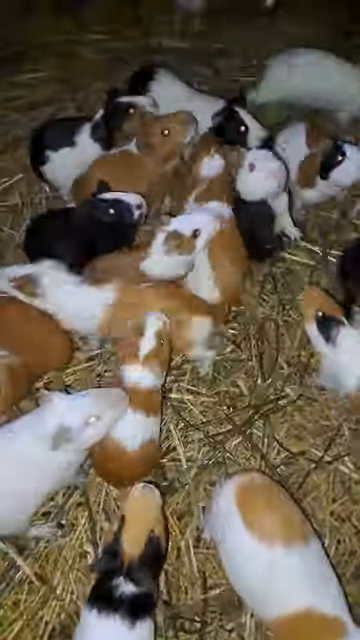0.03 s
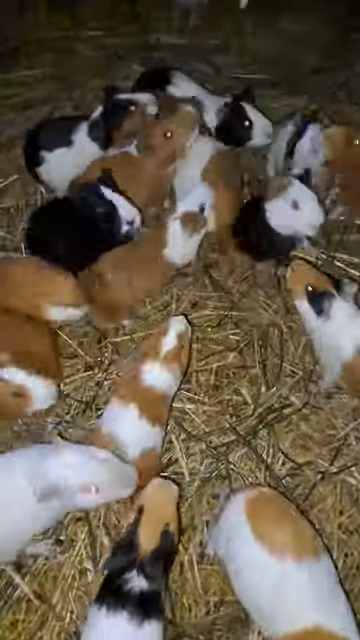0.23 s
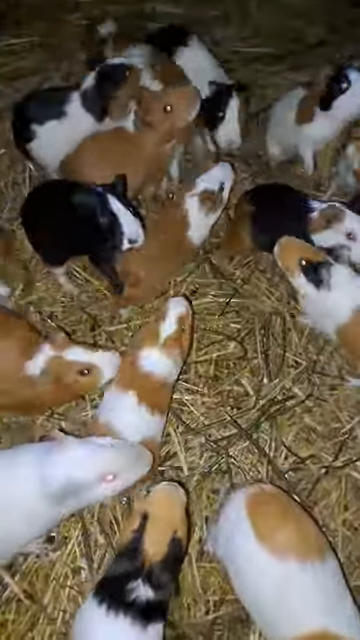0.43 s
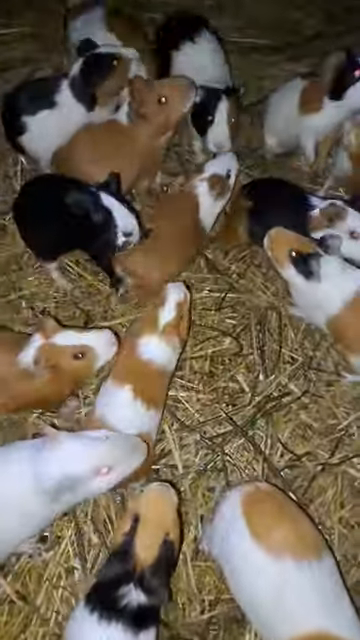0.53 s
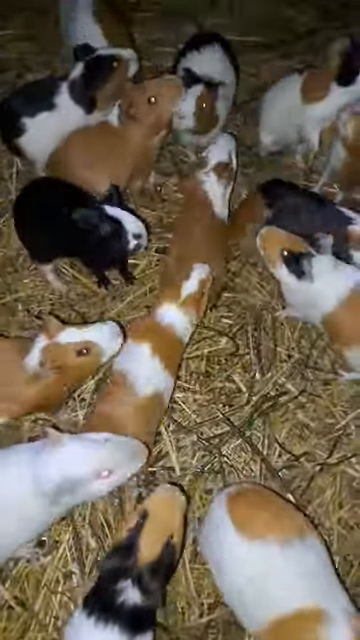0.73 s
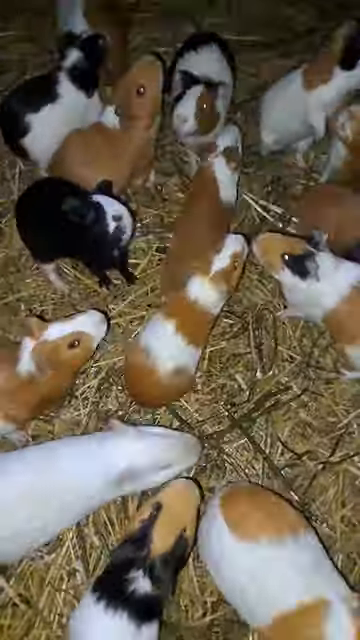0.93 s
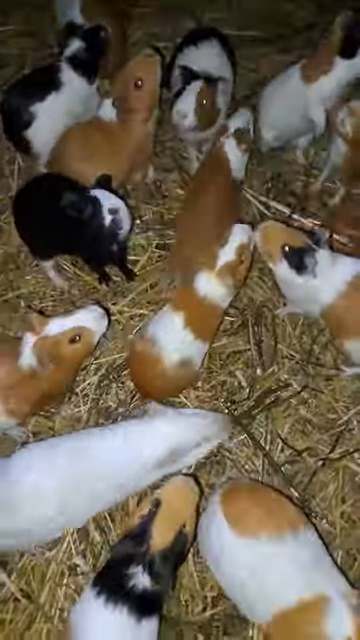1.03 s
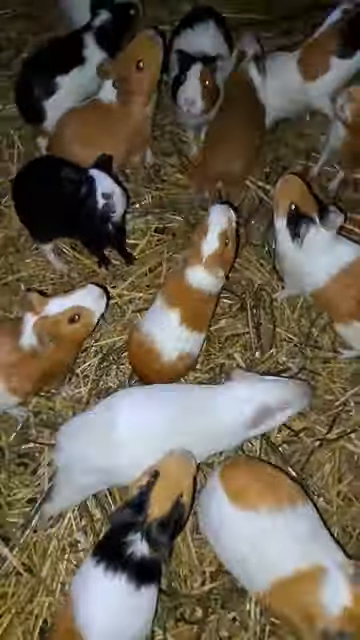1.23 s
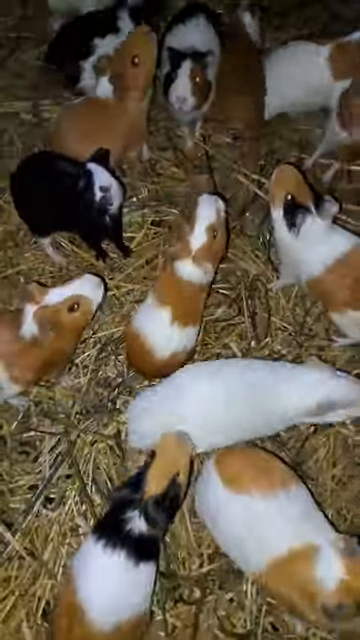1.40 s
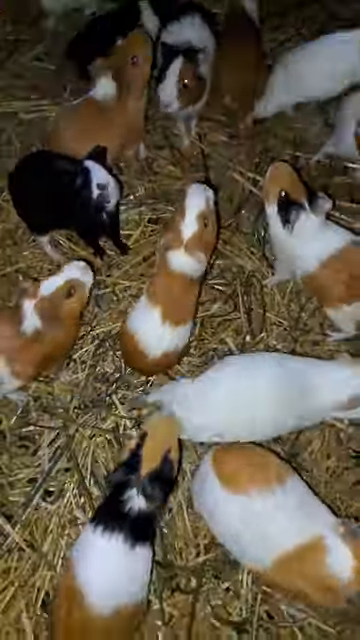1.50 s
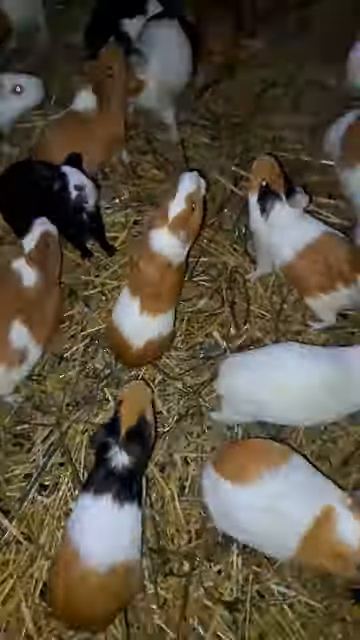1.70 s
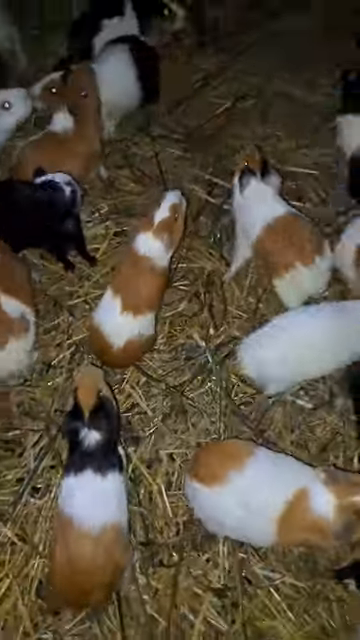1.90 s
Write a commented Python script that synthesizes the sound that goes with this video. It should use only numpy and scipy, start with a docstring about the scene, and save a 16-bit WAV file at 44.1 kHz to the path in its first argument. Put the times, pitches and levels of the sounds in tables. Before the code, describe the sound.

Guinea pigs squeal in rising whistles over a peeping herd and rustling straw.

```python
"""A herd of guinea pigs begs for food on straw in a barn.
From the start the herd chatters in short rising peeps while feet rustle the straw over a low hush.
One close animal wheeks twice: each time a thin rising lead-in, a loud whistle, then a leap upward.
At 1.2 s it gives a third, weaker wheek; the barn rings briefly after each call.
Peeps and rustling carry on to the end, and a stalk cracks among them."""
import sys
import numpy as np
from scipy import signal
from scipy.fft import rfft, irfft, next_fast_len
from scipy.io import wavfile
from scipy.ndimage import uniform_filter1d

SR = 44100
rng = np.random.default_rng(int(sys.argv[2]) if len(sys.argv) > 2 else 0)


def to_wav(s):
    """Save 16-bit WAV."""
    ch = np.atleast_2d(s).T  # columns
    pcm = np.round(np.clip(ch, -1, 1) * 32767)  # PCM
    wavfile.write(sys.argv[1], SR, pcm.astype(np.int16))


N = 85995

# Contours of the three wheeks: time_s, pitch_hz, fundamental_db, octave_db
FIRST_WHEEK = [(0.141, 1250, -44, -49.5), (0.179, 1660, -43.5, -43), (0.229, 2002, -27, -41.5),
               (.25, 2197, -14, -52), (.285, 2325, -13, -28), (0.304, 2402, -13, -24),
               (.313, 2626, -20.5, -22), (0.318, 2940, -24.5, -16), (0.337, 3290, -32, -15),
               (.37, 3763, -29, -31.5), (.416, 4183, -24.5, -31), (0.426, 4500, -24.5, -28),
               (.442, 4434, -24.5, -30.5), (.453, 4030, -30.5, -54)]
SECOND_WHEEK = [(0.63, 771, -41.5, -63), (0.667, 1098, -38, -42), (0.702, 1564, -42, -49.5),
                (0.761, 1657, -56, -34.5), (0.819, 1948, -39, -36), (0.824, 2100, -22.5, -32.5),
                (.85, 2216, -16, -35.5), (.887, 2353, -14.5, -43), (.894, 2493, -15.5, -23),
                (0.896, 2865, -30.5, -18.5), (0.914, 3295, -25, -18), (0.922, 3576, -32, -27.5),
                (0.956, 3970, -35, -35.5), (0.982, 4106, -32.5, -48), (0.996, 3990, -39, -42.5)]
THIRD_WHEEK = [(1.214, 839, -52, -46), (1.259, 1281, -38.5, -49), (1.302, 1377, -49.5, -48.5),
               (1.35, 2000, -50, -46.5), (1.358, 2054, -29, -60), (1.369, 2750, -37, -43),
               (1.393, 3400, -34, -30.5), (1.407, 3728, -33.5, -42.5), (1.421, 3600, -39.5, -42)]
# Throat resonances that colour the overtones: frequency_hz, gain_db
THROAT_RESPONSE = [(1500, 22), (3300, 0.5), (4400, -6), (5500, -0.5), (7300, 1.5), (8400, -16), (9500, -22),
                   (11000, -14.5), (12500, -5.5), (15500, -13)]
# Interchannel level difference of the close animal: frequency_hz, left_minus_right_db
CALLER_BALANCE = [(1200, -14), (2300, -4.5), (3600, -7), (5000, -19.5), (6200, -20), (7200, 3),
                  (8200, 13.5), (9000, 15), (12000, -1.5), (15000, 10)]
JITTER, JITTER_HZ, SHIMMER_DB, SHIMMER_HZ = 0.0016, 350, 1.5, 64.6
RASP_DB, RASP_HZ, HISS_DB, HISS_LOW_HZ = -19, 500, -26, 4500
STRAIN_HZ = 4200  # reference pitch: rasp and hiss grow with the square of pitch
EDGE_S, LEFT_LEAD_S, OVERTONE_STEP_DB = 0.0012, 0.0001, -2.5


def wheek(contour, drive_ceiling_db):
    """Source and filter: a near-pure whistle's overtones flare as they sweep through throat resonances."""
    time_s, pitch_hz, fundamental_db, octave_db = np.transpose(contour)
    t = np.arange(time_s[0], time_s[-1], 1 / SR)
    hz = np.interp(t, time_s, pitch_hz) * (1 + JITTER * wander(len(t), JITTER_HZ))
    cycles = np.cumsum(hz) / SR + np.array([[LEFT_LEAD_S], [0]]) * hz
    fundamental_db, octave_db = np.interp(t, time_s, fundamental_db), np.interp(t, time_s, octave_db)
    # The upper overtones follow the octave's level before the throat, up to a ceiling.
    drive_db = np.minimum(octave_db - at_frequency(THROAT_RESPONSE, 2 * hz), drive_ceiling_db)
    air = highpass(rng.standard_normal((2, len(t))), HISS_LOW_HZ, order=3)
    out = unit_rms(air) * (hz / STRAIN_HZ) ** 2 * amp(octave_db + HISS_DB)
    for k in range(1, 9):
        upper_db = drive_db + at_frequency(THROAT_RESPONSE, k * hz) + OVERTONE_STEP_DB * (k - 2)
        level_db = fundamental_db if k == 1 else octave_db if k == 2 else upper_db
        rasp = amp(RASP_DB) * ((k - 1) * hz / STRAIN_HZ) ** 2
        roughness = (1 + rasp * sideband_noise(len(t), RASP_HZ)) / np.sqrt(1 + 2 * rasp ** 2)
        tone = (roughness * np.exp(2j * np.pi * k * cycles)).real * (k * hz < SR / 2)
        pan = amp(at_frequency(CALLER_BALANCE, k * hz) * np.array([[.5], [-.5]]))
        pan /= np.sqrt(np.mean(pan ** 2, axis=0))
        out += pan * amp(level_db + SHIMMER_DB * wander(len(t), SHIMMER_HZ)) * tone
    return time_s[0], np.sqrt(2) * out * fade(t - time_s[0], EDGE_S, EDGE_S)


PEEP_SWELL, PEEP_RELEASE_S, PEEP_JITTER = 0.11, 0.0041, 0.015
PEEP_OVERTONE_DB, DULL_HZ = -10, 2100  # overtone gain ahead of the low-pass, and its corner
HOARSENESS, HOARSE_HZ, LAG_S_PER_DB = .23, 110, .00005


def peep(start_s, length_s, first_hz, last_hz, level_db, glide_exponent, side_db):
    """Noise modulation makes a short gliding call hoarse; distance dulls its overtones."""
    t = np.arange(0, length_s, 1 / SR)
    hz = first_hz + (last_hz - first_hz) * (t / length_s) ** glide_exponent
    hz *= 1 + PEEP_JITTER * wander(len(t), hz=87.0)
    pan_db = side_db * np.array([[-.5], [.5]])
    cycles = np.cumsum(hz) / SR + pan_db * LAG_S_PER_DB * hz  # the louder side leads
    voice = 0
    for k in range(1, 4):
        roughness = 1 + k * HOARSENESS * sideband_noise(len(t), HOARSE_HZ)
        gain = 1 if k == 1 else amp(PEEP_OVERTONE_DB) / (1 + (k * hz / DULL_HZ) ** 4)
        voice += gain * (roughness * np.exp(2j * np.pi * k * cycles)).real
    return start_s, voice * amp(level_db + pan_db) * fade(t, PEEP_SWELL * length_s, PEEP_RELEASE_S)


# Clear peeps: start_s, length_s, first_hz, last_hz, level_db, glide_exponent, right_minus_left_db
CLEAR_PEEPS = [ (0.057, 0.077, 1966, 2730, -46, 1.8, 7), (0.062, 0.079, 637.6, 930, -38.5, 1.53, 4.5),
               (.19, 0.047, 792, 1410, -37.5, 2.03, 2), (0.335, 0.036, 420.5, 646, -40.5, 2.14, -2.5),
               (.405, 0.063, 721.4, 1400, -42, 2.6, -2), (0.441, 0.11, 459.4, 830, -47, 1.4, 1),
               (0.582, 0.053, 1326, 1434, -37.5, 1.86, 9.5), (0.811, 0.19, 690, 1685, -42.5, 1.28, 1),
               (.99, 0.073, 487, 525, -47.5, 3, -2), (1.028, 0.036, 2800, 3010, -41, 0.51, 4.5),
               (1.16, .16, 744, 1501, -40.5, 2.77, 5), (1.393, 0.058, 887, 2110, -46, 2.42, -1),
               (1.469, 0.0603, 837, 726, -42, 0.99, -4), (1.538, 0.12, 774, 1818, -36, 5.5, 6),
               (1.625, 0.065, 465.4, 697, -43.5, 1.14, 2), (1.716, 0.11, 624.6, 892, -48, 2, -3.5),
               (1.865, 0.041, 464.5, 716, -40.5, 2.34, -1.5), (1.876, 0.032, 838, 1720, -45, 1.4, 7.5),
               (1.918, 0.0298, 1145, 2100, -45.5, 1, 0.5)]
# Steady chatter, then three flurries: start_s, end_s, median_first_hz, median_level_db
CHATTER_SPANS = [(0, 1.96, 783, -52), (0, .2, 950, -45.5), (.13, .18, 518.4, -43),
                 (1.11, 1.18, 1047, -43.5)]
CHATTER_PER_S, EXTRA_PEEPS, CHATTER_RISE, CHATTER_S = 36, 4, 1.6, .065


def herd():
    """Superposition of many voices: clear peeps stand over random chatter from farther back."""
    out = np.zeros((2, N))
    for row in CLEAR_PEEPS:
        add(out, *peep(*row))
    for start_s, end_s, median_hz, level_db in CHATTER_SPANS:
        count = int(CHATTER_PER_S * (end_s - start_s)) + EXTRA_PEEPS
        for i, (shift, stretch, octaves, accent, side) in enumerate(rng.uniform(-.5, .5, (count, 5))):
            onset_s = start_s + (end_s - start_s) * (i + shift) / count
            hz = median_hz * 2 ** octaves
            add(out, *peep(onset_s, CHATTER_S * 2 ** stretch, hz, hz * CHATTER_RISE,
                           level_db + 6 * accent, glide_exponent=2, side_db=20 * side))
    return out


# Envelope of the rustle: time_s, level_db
RUSTLE_ENVELOPE = [(0, -44), (.45, -45), (.56, -49.5), (0.628, -41), (.95, -51.5), (1.1, -55.5),
                   (1.199, -51.5), (1.62, -47.5), (1.72, -50.5), (1.95, -48)]
# Spectrum of the snapping straw: frequency_hz, gain_db
STRAW_SPECTRUM = [(100, -26), (330, 1), (1400, 6.5), (3500, -4), (5600, 1), (7500, -13), (10000, -12.5),
                  (15000, -10.5)]
# Single stalks that crack: start_s, level_db
STALK_CRACKS = [(0.0332, -41.5), (1.6528, -43)]
SNAPS_PER_S, SNAP_SPREAD_DB, CRACK_DECAY_S = 6600, 2.5, 0.0058


def straw():
    """Shot noise: tiny snaps under shuffling feet merge into a rustle; two louder cracks stand out."""
    hz = np.fft.rfftfreq(N, 1 / SR)
    snaps = rng.standard_normal((2, N)) * (rng.random((2, N)) < SNAPS_PER_S / SR)
    snaps *= amp(SNAP_SPREAD_DB * np.minimum(rng.exponential(1, (2, N)), 4))
    out = unit_rms(irfft(rfft(snaps) * amp(at_frequency(STRAW_SPECTRUM, hz)), N))
    out *= amp(np.interp(np.arange(N) / SR, *np.transpose(RUSTLE_ENVELOPE)))
    t = np.arange(SR // 50) / SR
    for start_s, level_db in STALK_CRACKS:
        add(out, start_s, amp(level_db) * np.exp(-t / CRACK_DECAY_S) * rng.standard_normal((2, len(t))))
    return out


def pen_echoes(x, gap_s=.003, decay_s=0.0096, low_hz=3599):
    """Early reflections: the floor and pen walls scatter back mostly the shrill part of a call."""
    t = np.arange(SR // 10) / SR
    taps = rng.standard_normal((2, len(t))) * np.exp(-t / decay_s) * (t > gap_s)
    taps = highpass(taps, low_hz, order=2)
    return signal.fftconvolve(x, taps / np.linalg.norm(taps[0]), axes=1)[:, :N]


# Reverberation time of the barn: frequency_hz, t60_s
BARN_DECAY = [(300, 0.11), (4500, 0.24), (9000, 0.24), (15000, 0.039)]


def barn_reverb(x):
    """Diffuse reverberation: each band of the tail decays exponentially at its own rate."""
    hz, t, bands = signal.stft(rng.standard_normal((2, SR // 2)), SR, nperseg=256)
    decay = 1000 ** (-t / at_frequency(BARN_DECAY, hz)[:, None])
    tail = signal.istft(bands * decay, SR, nperseg=256)[1]
    return signal.fftconvolve(x, tail / np.linalg.norm(tail[0]), axes=1)[:, :N]


# Spectrum of the barn and distant straw: frequency_hz, gain_db
HUSH_SPECTRUM = [(25, -5), (60, 0.5), (170, -4), (330, 0.5), (800, -9), (1500, -24), (3000, -14),
                 (9000, -26.5), (15500, -21)]
# Likeness of left and right: frequency_hz, coherence
HUSH_COHERENCE = [(60, 0.64), (250, 0.9), (700, 1), (1500, 0.14)]
HUSH_DB, HUSH_PATCHY_DB = -53.5, 2.5


def hush():
    """Partly coherent ambient noise: the barn's low rumble and soft hiss drift in patches."""
    hz = np.fft.rfftfreq(2048, 1 / SR)
    a, b, c, d, patches = rng.standard_normal((5, len(hz), N // 512 + 5))
    patches = uniform_filter1d(patches, size=7, axis=1)  # smooth over time, then frequency
    patches = unit_rms(uniform_filter1d(patches, size=14, axis=0))
    coherence = np.clip(at_frequency(HUSH_COHERENCE, hz), -1, 1)[:, None]
    left, independent = a + 1j * b, c + 1j * d
    bands = np.array([left, coherence * left + np.sqrt(1 - coherence ** 2) * independent])
    bands *= amp(at_frequency(HUSH_SPECTRUM, hz)[:, None] + HUSH_PATCHY_DB * patches)
    return amp(HUSH_DB) * unit_rms(signal.istft(bands, nperseg=2048, noverlap=1536)[1][:, :N])


def amp(db):
    """Decibels to amplitude ratio."""
    return 10 ** (np.asarray(db) / 20)


def unit_rms(x):
    """Normalisation to unit power."""
    return x / np.sqrt(np.mean(x ** 2) + 1e-20)


def at_frequency(table, hz):
    """Interpolation on a log-frequency axis."""
    table_hz, value = np.transpose(table)
    return np.interp(np.log(hz + 1), np.log(table_hz + 1), value)


def add(mix, start_s, sound):
    """Superposition of a stereo sound on the mix."""
    part = mix[:, max(round(start_s * SR), 0):][:, :sound.shape[1]]
    part += sound[:, :part.shape[1]]


def highpass(x, hz, order):
    """Maximally flat high-pass filter."""
    return signal.sosfilt(signal.butter(order, hz, "high", fs=SR, output="sos"), x)


def wander(size, hz):
    """Low-pass noise: smooth random motion up to about hz."""
    length = next_fast_len(size + SR // 20)
    f = np.fft.rfftfreq(length, 1 / SR)
    return unit_rms(irfft(rfft(rng.standard_normal(length)) / (1 + (f / hz) ** 2), length))[:size]


def sideband_noise(size, hz):
    """Complex stereo noise: as a modulator it spreads a tone by about hz each way."""
    return np.array([wander(size, hz) + 1j * wander(size, hz) for side in "LR"])


def fade(t, attack_s, release_s):
    """Raised-cosine attack and release around a hold."""
    return np.sin(np.pi / 2 * np.clip(np.minimum(t / attack_s, (t[-1] - t) / release_s), 0, 1)) ** 2


def scene():
    """Direct and reflected sound add: the close caller and the herd ring in the barn, over the straw."""
    caller = np.zeros((2, N))
    for contour, drive_ceiling_db in (FIRST_WHEEK, -33), (SECOND_WHEEK, -31), (THIRD_WHEEK, -50):
        add(caller, *wheek(contour, drive_ceiling_db))
    others, rustle = herd(), straw()
    reverb = barn_reverb(amp(-15) * caller + amp(-11) * others)
    echoes = amp(-10.5) * pen_echoes(caller)
    background = (rustle + hush()) * amp([[-1.1], [1.1]])  # leans to the right
    return caller + others + echoes + reverb + background


def record(dry):
    """Band limiting: a linear-phase low-pass removes the highest treble."""
    lowpass = signal.firwin(511, cutoff=15750, window=("kaiser", 9), fs=SR)
    return signal.oaconvolve(dry, lowpass[None], "same")


dry = scene()
out = record(dry)
to_wav(out)
```